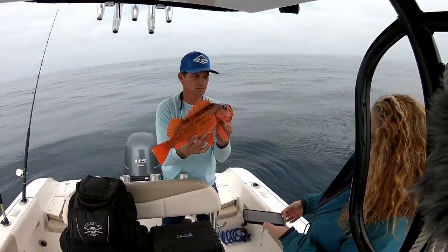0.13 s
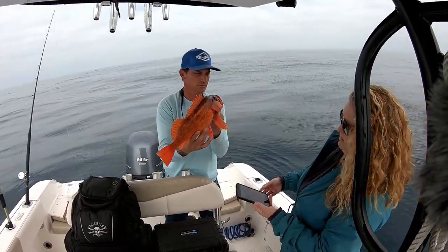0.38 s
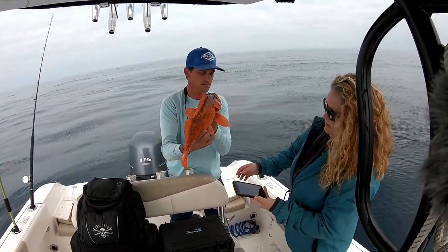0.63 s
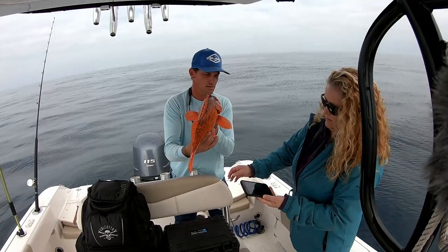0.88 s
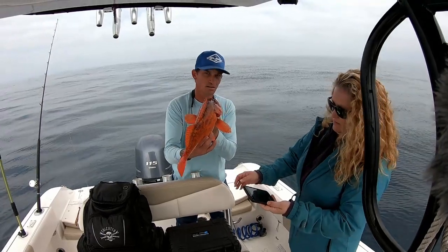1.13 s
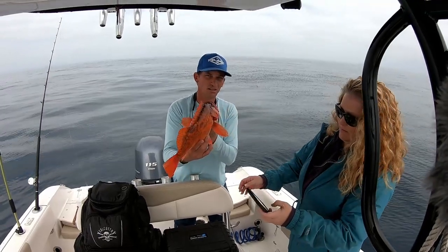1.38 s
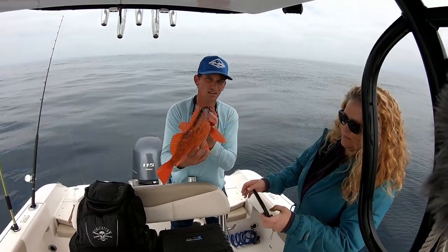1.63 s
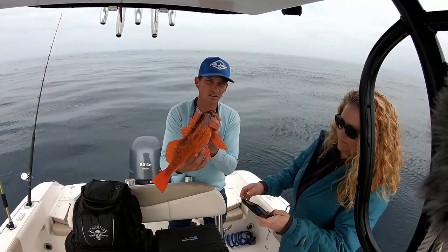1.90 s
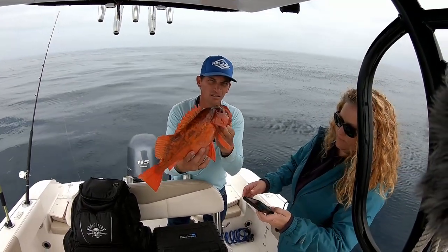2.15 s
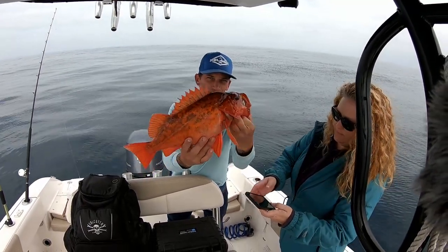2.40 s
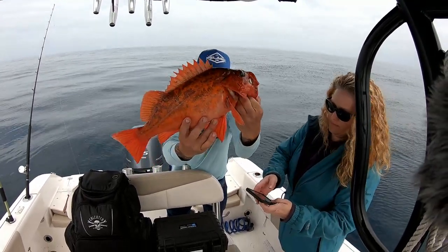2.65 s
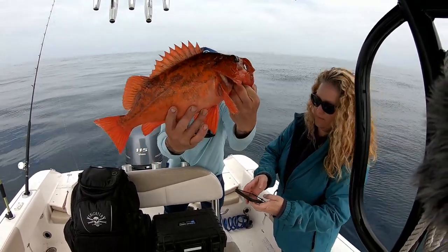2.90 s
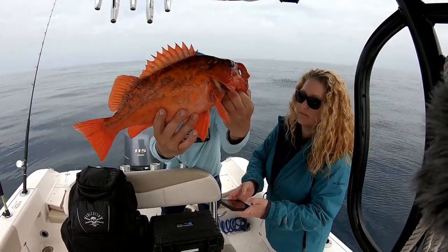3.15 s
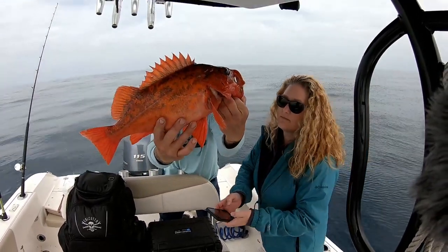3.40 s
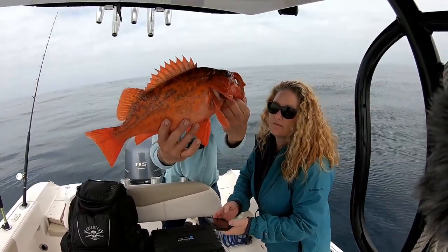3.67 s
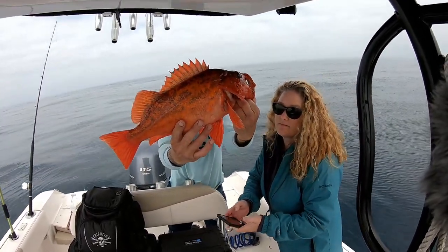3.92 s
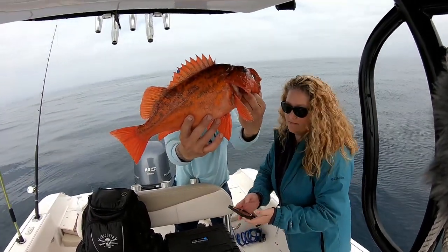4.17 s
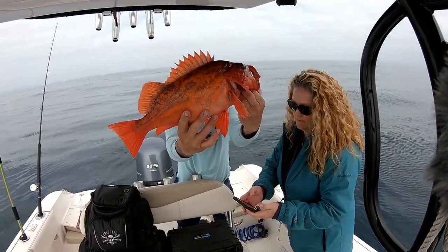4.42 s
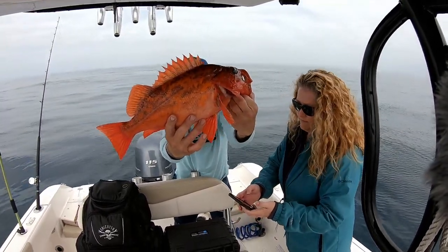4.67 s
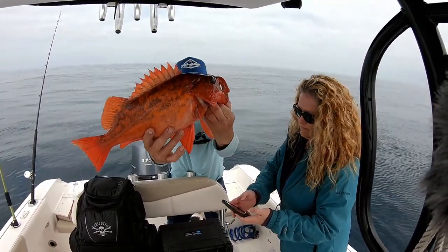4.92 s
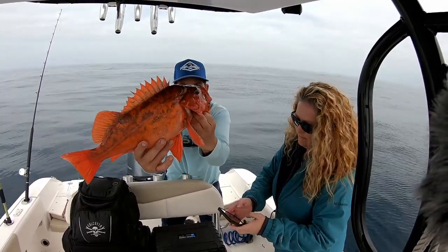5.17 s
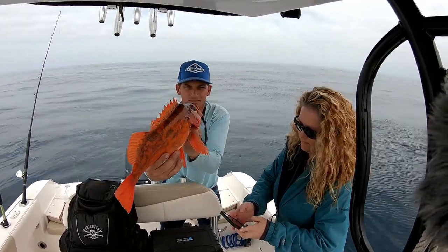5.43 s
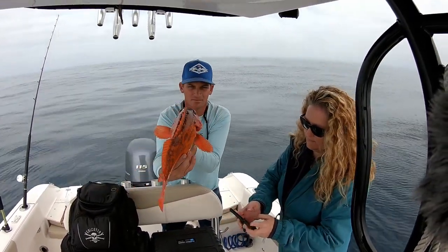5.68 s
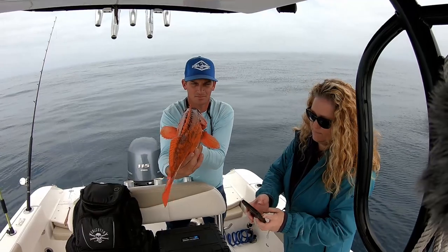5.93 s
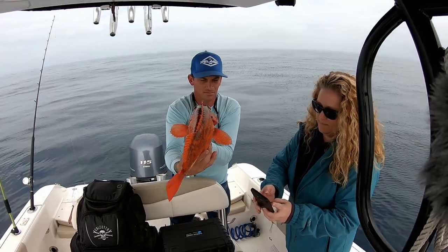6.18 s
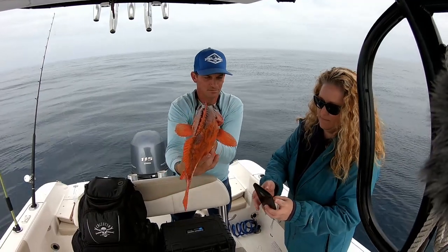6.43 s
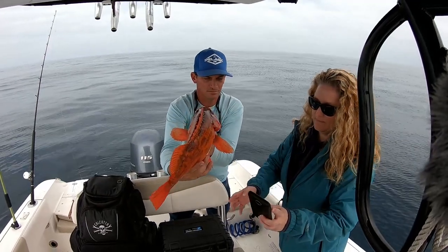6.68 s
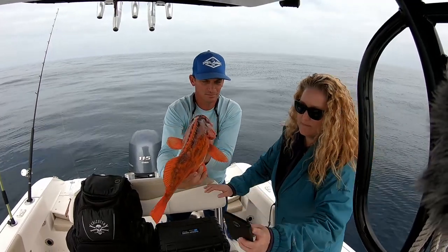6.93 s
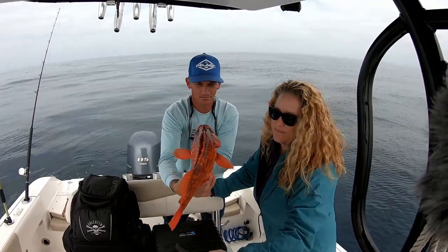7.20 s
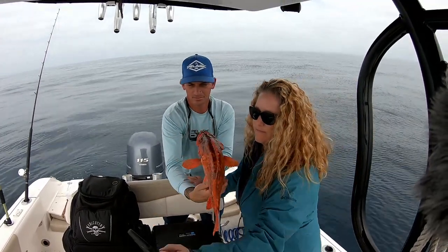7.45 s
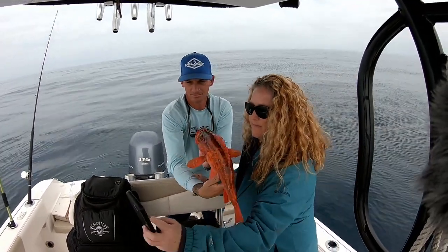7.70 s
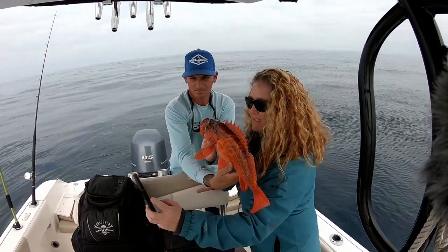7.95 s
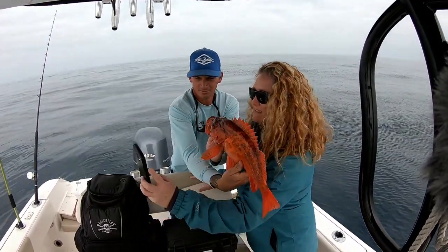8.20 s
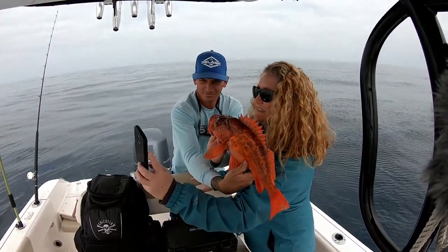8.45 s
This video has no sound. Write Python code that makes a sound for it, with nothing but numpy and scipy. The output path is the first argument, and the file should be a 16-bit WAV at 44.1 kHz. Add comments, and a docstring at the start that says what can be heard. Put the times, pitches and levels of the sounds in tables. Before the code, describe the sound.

Close stereo sound from a microphone fixed on a small boat drifting with its engine off. Gusty wind rumbles low throughout, fluttering unevenly between left and right, over a very faint hiss of water and rubbing cloth. In the first half second small parts tick and gear clacks with a low thump; soft knocks begin at 0.5. A sharp double clack lands at 1.1. From 1.5 to 2.5 it is mostly wind; a stronger gust and a hollow knock come at 2.7-2.8. Rush bursts and a light scrape come around 4.0-4.2, then the strongest dull knock at 4.4 and clattering gear until 4.7. A heavy one-sided flutter strikes at 5.7 with woody knocks. Deep deck thumps at 6.3-6.5 join sharp clacks through 6.7, with faint squeaks from 6.1. After a sparser stretch with a knock at 7.4, wind swells at 8.0 and rapid clacks follow at 8.15-8.2, one more at 8.4.

```python
"""A small boat drifts on calm water with its engine off, heard by a two-port microphone fixed to the frame.
From the start wind noise, shaped by gusts, rumbles, flutters and rushes on the ports over a faint filtered
hiss of water and cloth. Small parts tick as damped sines, loose gear clacks as noise bursts in resonators and
the deck thumps as one struck mode. From half a second soft knocks ring as damped sines and in the hull modes,
then grit clicks through resonances scrape the deck; after six seconds narrower ones squeak faintly."""
import sys
import numpy as np
from scipy import signal
from scipy.fft import rfft, irfft, next_fast_len
from scipy.io import wavfile
from scipy.ndimage import uniform_filter1d

SR = 44100
rng = np.random.default_rng(int(sys.argv[2]) if len(sys.argv) > 2 else 0)


def gain_from_decibels(decibels):
    """Convert decibel values to linear amplitude factors."""
    exponent = np.asarray(decibels, float) / 20
    return 10 ** exponent


def pcm_store(signal):
    """Save signal as 16-bit PCM."""
    levels = np.round(np.clip(np.atleast_2d(signal), -1, 1) * 32767)
    wavfile.write(sys.argv[1], SR, levels.astype(np.int16).T)


N = 378378  # samples
CONTROL_STEP = 40  # samples between points of the slow curves

# Gusts breaking on the ports. Each row: start in seconds, flutter level in dB, deep rumble level in dB,
# 60 dB decay time of the rumble in seconds, left-right difference in dB.
GUSTS = [(-0.01, -25, -15.5, 0.33, 3), (0.092, -19.5, -17, 1.12, -28), (0.31, -24, -21, 1.04, 16),
         (0.82, -18.5, -16, 2.3, -20.5), (1.35, -21, -35, 0.85, 15.5), (1.58, -17.5, -23, 2.7, 19),
         (1.621, -16.5, -18.5, 1.63, -17), (1.96, -43, -22, 0.6, -23), (2.633, -40, -29, 4.4, 21),
         (2.669, -9, -32, 0.77, -22), (2.91, -21, -21, 3.24, 10.5), (3.309, -18.5, -22, 1.46, -19),
         (3.962, -18.5, -30.5, 2.15, 17), (4.202, -20.5, -22, 5.3, -25.5), (4.888, -19.5, -27, 1.7, 24.5),
         (5.058, -11.5, -22.5, 0.53, -14.5), (5.101, -17.5, -25, 1.63, 13), (5.351, -24.5, -19, 0.61, -23),
         (5.529, -27.5, -31.5, 1.25, 8), (5.64, -19.5, -21, 0.77, -28), (5.719, -2, -40.5, 0.29, 26),
         (6.218, -19.5, -20, 2.73, -21.5), (6.42, -26, -15, 0.82, -17), (6.621, -29, -21.5, 0.31, 27),
         (7.26, -33.5, -25.5, 26, -13), (7.489, -21.5, -24, 4.03, 16.5), (7.522, -23, -14.5, 0.94, -15.5),
         (7.984, -9, -21, 1.86, -23), (8.102, -24, -18, 2, 19)]
# Bursts of low-middle rush on the ports, from gust fronts and from jolts of the mount.
# Each row: start in seconds, level in dB, 60 dB decay time in seconds, left-right difference in dB.
RUSH_BURSTS = [(0.122, -28, 0.46, -6), (0.349, -34, 0.093, 31), (0.591, -33, 0.17, 24),
               (0.84, -35.5, 0.59, -11), (0.91, -32.5, 0.34, -13), (1.119, -24.5, 0.22, -15.5),
               (1.599, -31, 1.14, 5), (2.668, -27, 0.81, -12.5), (2.693, -15.5, 0.21, -14.5),
               (2.947, -22, 0.12, 15), (3.109, -31, 0.11, 5), (3.209, -38, 0.11, 4),
               (3.564, -29.5, 0.46, -15), (4.017, -14, 0.1, 22), (4.06, -25.5, 0.23, 9),
               (4.12, -29.5, 0.11, 13), (4.229, -38.5, 2.6, -16), (4.414, -26.5, 0.91, -24),
               (4.68, -24, 0.56, -28), (4.928, -35.5, 0.35, 14.5), (5.06, -26.5, 1.17, 4),
               (5.27, -21.5, 0.13, 9), (5.475, -15, 0.052, 11.5), (6.106, -32.5, 1.35, -18.5),
               (6.322, -24, 0.49, -12), (6.651, -23.5, 0.14, 9), (6.707, -20.5, 0.19, -33),
               (7.448, -29, 0.23, -10), (7.592, -32.5, 0.1, 22.5), (7.88, -37.5, 0.12, 21),
               (7.993, -33, 1.1, -0.5), (8.163, -29, 0.6, -13.5), (8.421, -22.5, 0.21, -20)]
# Noise spectra of the three wind layers. Each row: frequency in Hz, density in dB per Hz (relative).
DEEP_SPECTRUM = [(20, -2.5), (30, 4.5), (50, -1), (85, 0), (120, -25)]
FLUTTER_SPECTRUM = [(60, -19.5), (85, 8), (130, 8), (180, 2), (250, -8.5), (330, -18)]
RUSH_SPECTRUM = [(200, -21.5), (260, -1), (350, -3), (500, -15), (750, -23.5), (1100, -45.5), (1600, -60.5),
                 (2500, -86)]
FLUTTER_RISE_S, DEEP_RISE_S, RUSH_RISE_S = 0.029, 0.012, 0.012
FLUTTER_T60_SHARE = 0.56  # the flutter dies sooner than the deep rumble
CALM_FLUTTER_DB, CALM_DEEP_DB = -46, -40.5  # the light air between gusts
RUSH_DB, RUSH_SLOPE = -57, 1  # steady rush at a flutter of -30 dB; dB of rush per dB of flutter

# Cloth and gear rubbing. Each row: start in seconds, length in seconds, swish level in dB,
# scuffing level in dB before the layer gains.
RUBS = [(0.0, 0.27, -67, -65.5), (0.3, 0.96, -74, -77), (2.226, 0.24, -69.5, -88), (2.647, 0.078, -67, -55),
        (2.818, 0.027, -77, -63.5), (3.527, 0.18, -64.5, -64), (3.706, 0.26, -78, -74.5),
        (4.111, 0.098, -70, -79), (4.193, 0.12, -61.5, -60.5), (4.384, 0.086, -65, -57.5),
        (4.516, 0.29, -72, -63.5), (5.619, 0.035, -86, -70), (6.138, 0.069, -65, -58.5),
        (6.215, 0.58, -69, -62.5), (6.76, 0.3, -70.5, -78), (7.085, 0.028, -67.5, -72.5),
        (7.181, 0.28, -67, -68.5), (7.949, 0.28, -67.5, -63), (8.255, 0.21, -61.5, -64)]
# Spectra of the swish and of the scuffing. Each row: frequency in Hz, density in dB per Hz (relative).
SWISH_SPECTRUM = [(4000, -22.5), (5600, -13), (7300, -5.5), (8300, -16.5), (14000, -45)]
SCUFF_SPECTRUM = [(450, -9), (700, 10), (1200, 0.5), (2200, -7), (3200, -10.5), (4500, -16), (6000, -31)]
# Resonances of the loose gear. Each row: frequency in Hz, bandwidth in Hz, relative level in dB.
GEAR_RESONANCES = [(1277, 180, -3.5), (1810, 120, 5), (1970, 35, -6), (2525, 59, 3), (2820, 68, -7),
                   (3830, 83, -4.5), (4280, 21, -15)]
# Water along the hull, always there; the scuff level is before the layer gains.
LAPPING_SWISH_DB, LAPPING_SCUFF_DB = -86, -84
RUB_RISE_SHARE, RUB_T60_S = 0.25, 0.51  # a longer rub swells more slowly
CATCHES_PER_S, CATCH_S = 9.4, 0.0074  # a rubbing surface catches now and then

# Small hard parts ticking. Each row: start in seconds, level in dB before the layer gain,
# ring frequency in Hz, 60 dB decay time in seconds.
TICKS = [(0.0633, -46, 5960, 0.054), (0.2638, -43.5, 2420, 0.1), (0.3142, -43.5, 5250, 0.03),
         (0.3875, -49, 3640, 0.066), (0.4264, -54.5, 6140, 0.035), (4.221, -51.5, 3120, 0.041),
         (6.171, -41, 1790, 0.045), (7.615, -55, 2240, 0.17)]

# Clacks of the loose gear. Each row: start in seconds, level in dB before filtering, middle tone in dB
# relative to it, hull in dB relative to it (before the hull gain), 60 dB decay time of the main tail in seconds.
CLACKS = [(0.1258, -35.5, -6, 15, 0.16), (0.175, -32.5, -15, -12.5, 0.054),
          (0.2606, -51.5, -0.5, 10.5, 0.085), (0.615, -42.5, -8, 1.5, 0.13), (1.1152, -20, -25, -5, 0.097),
          (1.131, -23, -20, 0, 0.094), (1.1444, -34.5, -9, -3, 0.15), (3.5776, -36.5, -14, 9.5, 0.11),
          (4.4671, -28, -14.5, 2.5, 0.17), (4.4784, -28.5, -15.5, -9, 0.082),
          (4.4887, -27, -11.5, 3.5, 0.13), (4.5344, -43.5, -10, 13, 0.091), (4.6785, -23.5, -10, 2, 0.086),
          (4.7188, -18.5, -14.5, -2.5, 0.092), (5.6134, -77, 10.5, 46, 0.13), (6.336, -58, -0.5, 32, 0.079),
          (6.4557, -25, -19, 3, 0.11), (6.4966, -23.5, -16, 0, 0.089), (6.6728, -33, -0.5, 10, 0.089),
          (6.714, -21, -18.5, -2, 0.11), (7.4524, -59.5, 8, 27.5, 0.15), (7.6154, -46.5, -9, -25.5, 0.15),
          (8.1498, -25, -20, 4, 0.057), (8.1634, -26.5, -15.5, -3.5, 0.15), (8.1804, -31, -16, 6.5, 0.13),
          (8.1947, -29, -12.5, 6, 0.081), (8.2175, -35.5, -10, 9, 0.11), (8.4207, -19, -13, -2, 0.089)]
# Resonances of the microphone housing. Each row: frequency in Hz, bandwidth in Hz, relative level in dB.
HOUSING_RESONANCES = [(5745, 100, -2.5), (6140, 130, -4), (6710, 240, 1.5), (7600, 57, -8),
                      (7360, 290, -2.5), (8040, 130, -10.5)]
# Hull modes. Each row: frequency in Hz, relative level in dB, 60 dB decay time in seconds.
HULL_MODES = [(336, -7.5, 0.21), (476.3, -9.5, 0.15), (600, -11, 0.12), (695.5, 5.5, 0.16),
              (770, -9.5, .05), (835.3, 4, 0.097), (974, -5, 0.033), (1133, -8.5, .05), (1215, -5, 0.065)]

# Deck thumps. Each row: start in seconds, level in dB before the layer gain.
THUMPS = [(0.141, -23), (1.148, -22.5), (4.427, -27), (4.489, -28), (4.73, -24), (6.336, -15.5),
          (6.39, -20), (6.46, -27), (6.749, -31.5), (8.159, -26), (8.432, -23.5)]
THUMP_HZ, THUMP_T60_S = 170.9, 0.16

# Soft knocks. Each row: start in seconds, level in dB before the layer gain, main ring frequency in Hz,
# 60 dB decay time in seconds.
KNOCKS = [(0.502, -33.5, 906, 0.049), (0.75, -30, 760, 0.044), (0.914, -34, 551, 0.1),
          (2.17, -41, 685, 0.048), (2.171, -50.5, 1150, 0.078), (2.834, -22.5, 604, 0.042),
          (2.945, -35.5, 650, 0.038), (3.433, -42, 622, 0.11), (3.487, -42.5, 746, 0.15),
          (3.697, -40, 553, 0.27), (3.93, -47.5, 730, 0.14), (4.011, -27.5, 742, 0.055),
          (4.172, -47, 1176, 0.04), (4.422, -12, 598, 0.045), (5.589, -36, 716, 0.11),
          (5.669, -26.5, 794, 0.05), (5.824, -21, 725, 0.14), (5.913, -34.5, 1135, 0.047),
          (6.007, -35.5, 617, 0.16), (6.185, -30, 666, 0.12), (6.959, -47, 663, 0.063),
          (7.392, -26, 713, 0.052), (7.852, -48.5, 1174, 0.047), (7.991, -28, 1156, 0.031),
          (8.085, -32.5, 686, 0.26)]

# Short gritty scrapes of gear on the deck, then faint fluttering squeaks.
# Each row: start in seconds, length in seconds, level in dB, centre frequency in Hz.
SCRAPES = [(0.818, 0.011, -59, 1550), (0.84, 0.04, -43.5, 677), (3.115, 0.013, -52, 558),
           (3.295, 0.071, -52.5, 610), (3.995, 0.028, -51, 1250), (4.225, 0.031, -38, 926),
           (5.07, 0.011, -61, 1400), (5.1, 0.031, -52.5, 1400), (6.18, 0.25, -66, 2120),
           (6.333, 0.0061, -47.5, 2370), (6.8, .5, -78.5, 2500), (8.0, 0.021, -46, 1040),
           (8.086, 0.01, -61, 1780)]
SQUEAKS = [(6.11, .3, -76, 7700), (6.18, .13, -74, 4700), (7.05, .2, -80, 2300)]
GRIT_PER_S, SCRAPE_T60_S = 3000, 0.14

# Phase between the ports. Each row: frequency in Hz, lead of the left port in radians.
LEFT_LEAD = [(0, 0), (250, -2.4), (430, -3.4), (1210, -3.8), (2330, -5.5), (4500, -6.1), (9000, -5.9)]
# Self-noise. Each row of the spectrum: frequency in Hz, density in dB per Hz (relative).
SELF_NOISE_SPECTRUM = [(300, -2.5), (4000, -16.5), (8000, -5.0), (10000, -16.5), (16000, -35.0)]
SELF_NOISE_DB = -99


def rms_one(x):
    """Normalisation: a signal divided by its root mean square has rms 1."""
    return x / np.sqrt(np.mean(x ** 2) + 1e-20)


def at_every_sample(rows):
    """Linear interpolation carries slow curves from the control grid to every sample."""
    return np.array([np.interp(np.arange(N) / CONTROL_STEP, np.arange(len(row)), row) for row in rows])


def level_curves(power):
    """The level in dB is ten times the logarithm of power."""
    return at_every_sample(10 * np.log10(power))


def drift(rate, channels):
    """Low-passed noise: a slow random curve of spread 1, changing about rate times a second."""
    r = np.exp(-2 * np.pi * rate * CONTROL_STEP / SR)
    settle = 2000  # control points
    chance = rng.standard_normal((channels, N // CONTROL_STEP + 2 + settle))
    slow = signal.lfilter([1], [1, -2 * r, r * r], chance)[:, settle:]
    return at_every_sample([rms_one(row) for row in slow])


def coloured(spectrum, alike):
    """Spectral shaping: stereo noise, silent outside its spectrum; alike is the left-right correlation."""
    size = next_fast_len(N)
    hz, level_db = np.transpose(spectrum)
    log_hz = np.log(np.arange(size // 2 + 1) * SR / size + 1)
    gain = gain_from_decibels(np.interp(log_hz, np.log(hz), level_db, -150, -150))
    mid, side = irfft(rfft(rng.standard_normal((2, size))) * gain, size)[:, :N]
    return rms_one(np.sqrt(1 + alike) * mid + np.sqrt(1 - alike) * side * [[1], [-1]])


def evened(x, span_s):
    """Noise divided by its short-term level is nearly steady, leaving the gust to shape it."""
    short_power = uniform_filter1d(x ** 2, int(span_s * SR), axis=1)
    return rms_one(x / np.sqrt(short_power + 0.1))


def swell(start_s, rise_s, hold_s, t60):
    """Power envelope: a soft rise, then from hold_s after the start an exponential decay."""
    t = np.maximum(np.arange(0, N, CONTROL_STEP) / SR - start_s, 0)
    return (1 - np.exp(-t / rise_s)) ** 2 * gain_from_decibels(-120 * np.maximum(t - hold_s, 0) / t60)


def panned(pan_db):
    """A level difference between the ears places a sound: left and right gains as a column."""
    return gain_from_decibels(np.array([[pan_db / 2], [-pan_db / 2]]))


def filtered(x, order, hz, kind="low"):
    """A Butterworth filter passes its band without ripple."""
    return signal.sosfilt(signal.butter(order, hz, kind, fs=SR, output="sos"), x + 1e-18)


def resonate(x, table):
    """Parallel second-order resonators, their signs alternating."""
    out = 0
    for k, (hz, width, level_db) in enumerate(table):
        r = np.exp(-np.pi * width / SR)
        top = (1 - r * r) / 2 * gain_from_decibels(level_db) * (-1) ** k
        out = out + signal.lfilter([top, 0, -top], [1, -2 * r * np.cos(2 * np.pi * hz / SR), r * r], x + 1e-18)
    return out


def ring(push, hz, t60):
    """Impulse response of one mode: a unit click sets a decaying sine of height 1 ringing."""
    r, w = gain_from_decibels(-60 / (t60 * SR)), 2 * np.pi * hz / SR
    return signal.lfilter([0, np.sin(w)], [1, -2 * r * np.cos(w), r * r], push + 1e-18)


def struck(times_s, levels_db, length_s, hz):
    """Rough contact: swelling and dying noise bursts, each scaled by how strongly it drives the mode at hz."""
    t = np.arange(SR // 8) / SR
    out = np.zeros(N + len(t))
    bursts = rng.standard_normal((len(times_s), len(t))) * np.sqrt(t) * np.exp(-t / length_s)
    at_mode = abs(bursts @ np.exp(2j * np.pi * hz * t))
    overall = np.sqrt(np.sum(bursts ** 2, axis=1))
    push = np.hypot(at_mode, 0.6 * overall)  # the second term keeps a weak drive from being over-scaled
    for s, level_db, burst in zip(times_s, levels_db, bursts / push[:, None]):
        at = round(s * SR)
        out[at:at + len(t)] += gain_from_decibels(level_db) * burst
    return out[:N]


def hull(times_s, levels_db, length_s, top_hz):
    """Modal synthesis: each blow drives every mode with its own strength; a soft touch dulls the sound."""
    spots_db = 3.0 * rng.standard_normal((len(HULL_MODES), len(times_s)))
    rings = 0
    for (hz, mode_db, t60), spot_db in zip(HULL_MODES, spots_db):
        rings = rings + ring(struck(times_s, levels_db + mode_db + spot_db, length_s, hz), hz, t60)
    return filtered(rings, 4, top_hz)


def pings(table, rise_s, unsteady):
    """Damped oscillation: one decaying sine per row, swelling during contact, its phase wandering at random."""
    t = np.arange(SR // 2) / SR
    out = np.zeros(N + len(t))
    wander = np.cumsum(rng.standard_normal((len(table), len(t))), axis=1)
    wander = uniform_filter1d(wander, size=200)
    for (s, level_db, hz, t60), phase in zip(table, wander):
        envelope = (1 - np.exp(-t / rise_s)) ** 2 * gain_from_decibels(level_db - 60 * t / t60)
        at = round(s * SR)
        out[at:at + len(t)] += envelope * np.sin(2 * np.pi * hz * t + unsteady * phase)
    return out[:N]


def gust_powers():
    """Independent gusts add in power; each is weaker on one port. Returns flutter and deep rumble."""
    flutter, deep = gain_from_decibels(2 * CALM_FLUTTER_DB), gain_from_decibels(2 * CALM_DEEP_DB)
    for s, flutter_db, deep_db, t60, pan_db in GUSTS:
        share = gain_from_decibels(2 * np.minimum([[pan_db], [-pan_db]], 0))
        flutter_swell = swell(s, FLUTTER_RISE_S, 0, FLUTTER_T60_SHARE * t60)
        flutter = flutter + share * gain_from_decibels(2 * flutter_db) * flutter_swell
        deep = deep + share * gain_from_decibels(2 * deep_db) * swell(s, DEEP_RISE_S, 0, t60)
    return flutter, deep


def rush_power(flutter_power):
    """The steady rush follows a power law of the flutter; bursts add to it, shared between the ports."""
    power = gain_from_decibels(2 * RUSH_DB) * (flutter_power * 10 ** 3) ** RUSH_SLOPE
    for s, rush_db, t60, pan_db in RUSH_BURSTS:
        share = 2 / (1 + gain_from_decibels(-2 * np.array([[pan_db], [-pan_db]])))
        power = power + share * gain_from_decibels(2 * rush_db) * swell(s, RUSH_RISE_S, 0, t60)
    return power


def wind():
    """Turbulence: eddies break on each port as lumpy noise, the lumps faster in the higher layers."""
    flutter_power, deep_power = gust_powers()
    flutter_db, deep_db = level_curves(flutter_power), level_curves(deep_power)
    rush_db = level_curves(rush_power(flutter_power))
    lumps, puffs = drift(18, channels=2), drift(6, channels=2)

    deep_db = deep_db + 3.0 * puffs.mean(0)
    deep = gain_from_decibels(deep_db) * evened(coloured(DEEP_SPECTRUM, alike=0.17), span_s=0.97)

    flutter_db = flutter_db + 2.5 * lumps + 4.8 * puffs
    flutter = gain_from_decibels(flutter_db) * evened(coloured(FLUTTER_SPECTRUM, alike=0.033), span_s=0.069)

    eddy_hz = 320 * 2 ** (0.27 * drift(9, channels=2))  # an eddy's pitch wanders
    eddy_phase = 2 * np.pi * np.cumsum(eddy_hz, axis=1) / SR
    gurgle = 0.35 * drift(45, channels=2) * np.cos(eddy_phase)
    rush_db = rush_db + 4.2 * lumps.mean(0) + 4.0 * drift(17, channels=1)
    rush = gain_from_decibels(rush_db) * rms_one(coloured(RUSH_SPECTRUM, alike=-0.8) + gurgle)
    return deep + flutter + rush


def hiss():
    """Friction noise of water and cloth: a soft bright swish over grainy scuffing that excites the gear."""
    power = gain_from_decibels(2 * np.array([[LAPPING_SWISH_DB], [LAPPING_SCUFF_DB]]))
    for s, length_s, *levels_db in RUBS:
        rub = swell(s, RUB_RISE_SHARE * length_s, length_s, RUB_T60_S)
        power = power + gain_from_decibels(2 * np.array(levels_db))[:, None] * rub
    swish_db, scuff_db = level_curves(power)

    swish_db = swish_db + 2.5 * drift(14, channels=1)
    swish = gain_from_decibels(swish_db) * coloured(SWISH_SPECTRUM, alike=0.18) * panned(-6.5)

    catches = (rng.random(N) < CATCHES_PER_S / SR) * rng.exponential(1, N)
    caught = signal.lfilter([1], [1, -np.exp(-1 / (CATCH_S * SR))], catches + 1e-18)
    lumpy = rms_one(2.6 + caught)
    grain_db = 2 * drift(30, channels=1) + 1.5 * drift(150, channels=1)
    scuff_db = scuff_db + grain_db + 2.0 * drift(4.3, channels=1)
    scuff = lumpy * gain_from_decibels(scuff_db) * coloured(SCUFF_SPECTRUM, alike=0.7)
    return swish + gain_from_decibels(5.0) * scuff + gain_from_decibels(4.5) * resonate(scuff, GEAR_RESONANCES)


def ticks():
    """Small stiff bodies sound as brief damped sines with a very short contact."""
    return gain_from_decibels(-1) * pings(TICKS, rise_s=0.0005, unsteady=0.14) * panned(-3.5)


def clacks():
    """Impact: a sharp crack with a noisy tail excites the housing, the gear and the hull modes."""
    t = np.arange(SR // 4) / SR
    bright, middle = np.zeros((2, 2, N + len(t)))
    noise = rng.standard_normal((len(CLACKS), 3, len(t)))
    for (s, level_db, middle_db, _, t60), (shared, *own) in zip(CLACKS, noise):
        crack = 0.8 * np.exp(-t / 0.0025)
        envelope = gain_from_decibels(-60 * t / t60) + crack + gain_from_decibels(-28 - 60 * t / 0.18)  # the last is a faint longer tail
        burst = gain_from_decibels(level_db) * envelope * (shared + 0.55 * np.array(own))
        at = round(s * SR)
        bright[:, at:at + len(t)] += burst
        middle[:, at:at + len(t)] += burst * gain_from_decibels(middle_db) * (0.9 + 1.8 * np.exp(-t / 0.0015))

    in_housing = filtered(resonate(bright, HOUSING_RESONANCES), 4, 8600)
    air = filtered(bright, 2, [8800, 10500], "band")
    gear = gain_from_decibels(-3.5) * filtered(middle, 2, [1300, 5000], "band") + gain_from_decibels(1.5) * resonate(middle, GEAR_RESONANCES)
    near = gain_from_decibels(4) * in_housing * panned(-7.5) + gain_from_decibels(-37) * air + gain_from_decibels(4.5) * gear * panned(-2.5)

    s, level_db, _, hull_db, _ = np.transpose(CLACKS)
    body = hull(s, level_db + hull_db + 2.5, length_s=0.0091, top_hz=3040)
    return near[:, :N] + body * panned(-4.5)


def thumps():
    """Modal response: a rough contact sets one low mode of the deck ringing."""
    s, level_db = np.transpose(THUMPS)
    contact = struck(s, level_db + 6.0, length_s=0.025, hz=THUMP_HZ)
    return filtered(ring(contact, THUMP_HZ, THUMP_T60_S), 4, 260) * panned(-17.0)


def knocks():
    """A soft blow has a slow contact: it rings at the spot's own pitch and more weakly in the hull modes."""
    s, level_db, _, _ = np.transpose(KNOCKS)
    spot = gain_from_decibels(9) * pings(KNOCKS, rise_s=0.005, unsteady=0.085)
    body = hull(s, level_db - 17.0, length_s=0.014, top_hz=1020)
    return (spot + body) * panned(-3.5)


def scrapes(table, width_share):
    """Dragged grit: dense uneven clicks excite a resonance applied twice; a narrow one gives a squeak."""
    t = np.arange(SR) / SR
    out = np.zeros((2, N + SR))
    grit = (rng.random((len(table), SR)) < GRIT_PER_S / SR) * rng.laplace(0, 1, (len(table), SR))
    for (s, length_s, level_db, hz), clicks in zip(table, grit):
        body = [(hz, width_share * hz, 0)]
        tone = rms_one(resonate(resonate(filtered(clicks, 2, 2 * hz), body), body))
        fall_db = 60 * np.maximum(t - length_s, 0) / SCRAPE_T60_S
        envelope = np.minimum(t / 0.004, 1) * gain_from_decibels(level_db - fall_db)
        at = round(s * SR)
        out[:, at:at + SR] += envelope * tone
    return out[:, :N] * panned(-3.6)


def ports(x):
    """Interaural phase: sound from the boat reaches the two ports with a phase difference set by frequency."""
    size = next_fast_len(N + SR // 4)
    lead = np.interp(np.arange(size // 2 + 1) * SR / size, *np.transpose(LEFT_LEAD))
    return irfft(rfft(x, size) * np.exp(0.5j * lead * [[1], [-1]]), size)[:, :N]


def scene():
    """Superposition: wind acts on the ports directly, the sounds of the boat reach them with a phase lead."""
    wind_noise = wind()
    boat = hiss() + ticks() + clacks() + thumps() + knocks()
    boat = boat + scrapes(SCRAPES, width_share=0.42) + scrapes(SQUEAKS, width_share=0.025)
    return wind_noise + ports(boat)


def top_cut(x):
    """Nothing passes above the cut-off."""
    return signal.sosfilt(signal.butter(12, 15000, fs=SR, output="sos"), x)


def record(dry):
    """Noise floor: a faint coloured self-noise adds to the sound."""
    noise = gain_from_decibels(SELF_NOISE_DB) * coloured(SELF_NOISE_SPECTRUM, alike=0.1)
    return top_cut(dry + noise)


dry = scene()
out = record(dry)
pcm_store(out)
```